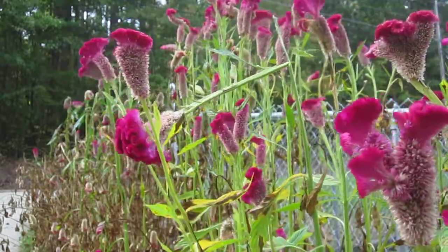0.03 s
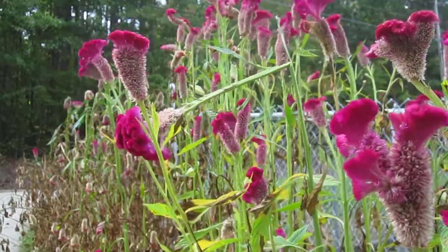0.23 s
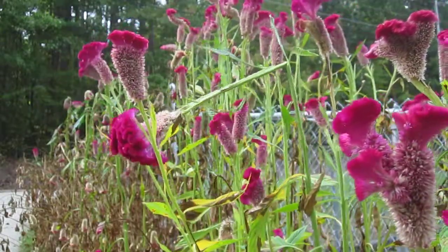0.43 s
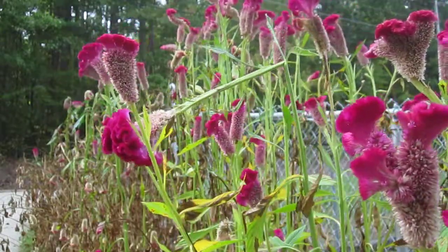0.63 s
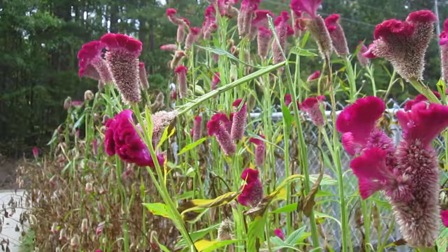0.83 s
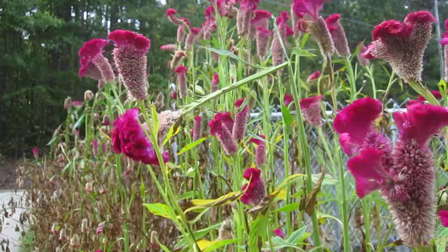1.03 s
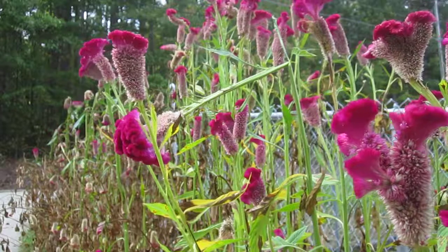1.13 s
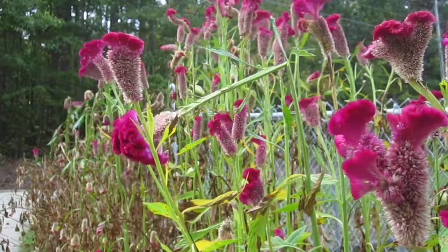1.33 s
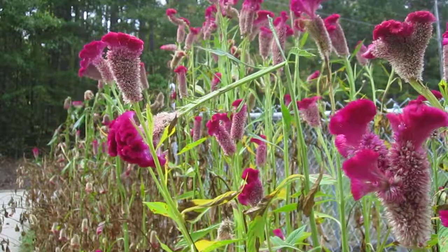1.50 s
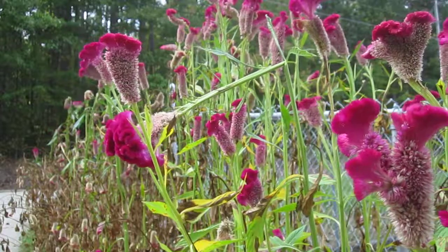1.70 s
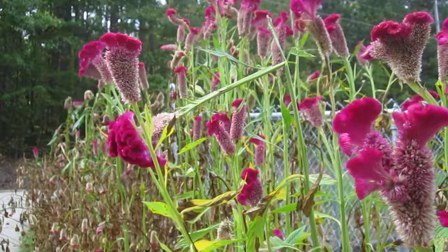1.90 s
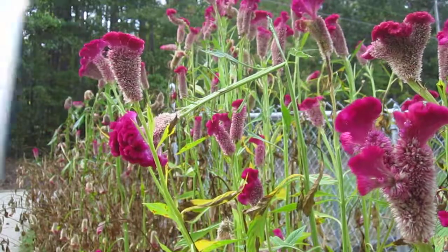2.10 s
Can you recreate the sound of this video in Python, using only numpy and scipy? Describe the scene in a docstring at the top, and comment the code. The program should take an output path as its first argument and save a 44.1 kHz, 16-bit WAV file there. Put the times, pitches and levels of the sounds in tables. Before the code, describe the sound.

Dry seed heads crackle and crunch as they are rubbed close up in a garden.

```python
"""Dry seed heads are rubbed and crushed right against a camera in a garden.
Thousands of tiny breaks make the husks crackle, larger husks snap, and stalks slip with short scuffs.
The scraping rings the stems and the camera's hollow case, which also gets a bump and two knocks.
Behind: the whine of the camera's drive, its zoom motor at the end, quiet air and two thin bird chirps."""
import sys
import numpy as np
from scipy import signal
from scipy.fft import rfft, irfft
from scipy.io import wavfile
from scipy.ndimage import uniform_filter1d

SR = 44100
rng = np.random.default_rng(int(sys.argv[2]) if len(sys.argv) > 2 else 0)


def store_pcm(level_fs):
    """Save levels as 16-bit WAV."""
    pcm = np.round(np.clip(level_fs, -1, 1) * 32767).astype(np.int16)
    wavfile.write(sys.argv[1], SR, np.atleast_2d(pcm).T)


N = 94815

# How hard the husks are rubbed: t/s, level/dB
RUBBING = [(0, -107), (.22, -60), (.27, -46.5), (.315, -37.5), (.355, -31), (.435, -29.5), (.465, -36),
           (.52, -30), (.55, -29.5), (.575, -41), (.605, -34.5), (.655, -38.5), (.705, -37), (.79, -37.5),
           (.845, -40), (.92, -41), (.965, -36.5), (1.01, -37.5), (1.045, -33.5), (1.08, -35),
           (1.12, -28.5), (1.15, -33.5), (1.21, -33.5), (1.26, -35.5), (1.295, -39.5), (1.385, -32),
           (1.43, -38), (1.47, -35), (1.502, -39), (1.535, -32), (1.565, -40), (1.64, -36.5), (1.685, -35),
           (1.725, -43.5), (1.795, -44.5), (1.85, -56.5), (1.92, -80)]
# Top fizz, stalk crunch and stem ring, each relative to the rubbing: t/s, level/dB
FIZZ_LEVEL = [(.25, -10), (.43, -10.5), (.55, -12), (.7, -8), (.9, -18), (1.1, -10), (1.3, -10),
              (1.47, -25), (1.6, -21), (1.68, -18), (1.8, -25)]
CRUNCH_LEVEL = [(.25, -25), (.35, -4), (.42, -13), (.9, -8), (1.03, -12.5), (1.075, -5.5), (1.14, -11),
                (1.37, -6), (1.47, -9), (1.52, -4), (1.57, -8), (1.68, -10), (1.74, -5)]
STEM_LEVEL = [(.3, -20), (.55, -8.5), (.8, -7), (1.1, -13), (1.28, -6.5), (1.38, -6), (1.47, 2),
              (1.55, -7.5), (1.63, -9), (1.7, -22)]
# Ring of the case, relative to the rubbing: t/s, low ring/dB, high ring/dB
CASE_LEVEL = [(.23, -28, -12), (.30, -14, -12), (.325, -19, -12), (.35, -15.5, -7), (.44, -9, -9),
              (.48, -13, -14.5), (.54, -13, -7), (.65, -12.5, -10.5), (.79, -13.5, -7.5), (.92, -14, -10.5),
              (1.1, -20, -11), (1.16, -17.5, -18), (1.39, -13, -12), (1.47, -17.5, -15),
              (1.54, -16.5, -14.5), (1.7, -19.5, -11.5), (1.78, -11, -23)]
# Tone colours of crackle, fizz and crunch: f/Hz, level/dB
HUSK_COLOUR = [(100, -29), (400, -36), (1100, -19.5), (2000, -7.5), (3100, -6), (4100, 2.5), (5300, 0),
               (7000, -3.5), (8800, -4.5), (10500, -3.5), (12500, -15), (16000, -29.5)]
FIZZ_COLOUR = [(2000, -50), (6500, 10), (9000, -30.5), (10400, -9), (12500, -6), (16000, -27)]
CRUNCH_COLOUR = [(100, -76.5), (400, -9.5), (800, -7), (1250, -14), (1750, -2), (2100, -3), (2600, 1),
                 (3300, 0.5), (4500, -10.5), (9000, -29.5)]
# Notes at which the stems and the case ring: f/Hz, level/dB, time to fade by 60 dB/s
STEM_NOTES = [(3680, -10, 0.049), (4050, -4.5, 0.018), (4370, -3, 0.02), (4590, -6.5, 0.04),
              (5310, -5.5, .03), (5770, -7.5, .025), (6460, -29, 0.017)]
CASE_LOW_NOTES = [(341, -1, 0.074), (395, -3.5, 0.037), (568, 5, 0.054), (574.4, 5, 0.064)]
CASE_HIGH_NOTES = [(1500, -10, 0.028), (1501, 13.5, 0.035), (1570, 6.5, 0.022)]

def rubbed_husks():
    """Clumps of tiny breaks crackle, fizz and crunch, and ring the stems and the case."""
    clumps = amp(1.5 * wander(seconds=.0023))
    husks, stalks, chaff = (tiny_breaks() * clumps for _ in range(3))
    crackle = colour(husks, HUSK_COLOUR)
    # The crackle also bounces off the case and stems close by.
    echo = signal.oaconvolve(crackle, unit_energy(burst(decay_s=.0013)))[:N] / np.sqrt(SR)
    layers = (steady(crackle + amp(-7) * echo)
              + amp(curve(FIZZ_LEVEL)) * steady(colour(chaff, FIZZ_COLOUR))
              + amp(curve(CRUNCH_LEVEL)) * steady(colour(stalks, CRUNCH_COLOUR))
              + amp(curve(STEM_LEVEL)) * steady(ring(chaff, STEM_NOTES))
              + amp(curve(CASE_LEVEL, column=1)) * steady(ring(husks, CASE_LOW_NOTES))
              + amp(curve(CASE_LEVEL, column=2)) * steady(ring(chaff, CASE_HIGH_NOTES)))
    return amp(curve(RUBBING)) * layers


def tiny_breaks(husks=16, breaks_per_s=7000):
    """Many husks crack at random, each with its own click and its own louder moments."""
    out = np.zeros(N)
    for _ in range(husks):
        size_db = 2 * np.minimum(rng.exponential(1, N), 4)
        swell_db = 3 * wander(seconds=.016)
        hits = (rng.random(N) < breaks_per_s / husks / SR) * rng.choice([-1, 1], N)
        click = unit_energy(burst(decay_s=.00043, size=256))
        out += signal.oaconvolve(amp(size_db + swell_db) * hits, click)[:N]
    return out


# Larger husks breaking: t/s, energy/dB, fade time/s, case ring relative to the snap/dB
HUSK_SNAPS = [(0.2269, -62, 0.0022, -5), (.244, -61, 0.01, -6), (0.2642, -59, 0.0013, -20),
              (0.28, -59.5, 0.0066, -4), (0.2919, -53.5, .005, -4.5), (0.3313, -67, 0.0018, -21),
              (0.331, -57.5, 0.0028, -5), (0.3675, -59, 0.0023, -10), (.419, -64, .002, 3),
              (0.5013, -62, 0.0017, -1.5), (0.5902, -52, 0.0057, -5.5), (0.6992, -55, 0.0019, -9),
              (.7227, -57, .0012, -28), (0.7639, -55, 0.0019, -5), (.7992, -54.5, 0.003, -5),
              (.824, -58, 0.002, -8), (0.857, -59.5, 0.0017, -4), (0.8877, -56, 0.0014, -15),
              (1.0345, -55, 0.0031, -25), (1.041, -51.5, 0.0017, -7.5), (1.067, -52, 0.0013, -16),
              (1.093, -56.5, 0.0007, -25), (1.109, -54.5, 0.0024, -3.5), (1.1788, -51.5, 0.0021, -8.5),
              (1.2492, -56, 0.0019, -20), (1.299, -59, 0.00053, -6), (1.397, -69, 0.00092, -17),
              (1.4690, -56, 0.0034, -29), (1.4835, -54.5, 0.0011, -39), (1.527, -69, 0.0015, -20),
              (1.5358, -53, .003, -12), (1.5465, -61, 0.00081, -13), (1.5735, -52.5, 0.00036, -32),
              (1.581, -58, .0008, -29), (1.5847, -61.5, 0.00037, -23), (1.5912, -55, 0.00036, -22),
              (1.633, -56.5, 0.0014, -24), (1.666, -58.5, 0.0026, -14), (1.6858, -57.5, 0.0024, -15),
              (2.087, -71, .003, -24)]
# Tone colour of a snap: f/Hz, level/dB
SNAP_COLOUR = [(150, -31), (1100, -33), (2000, -9.5), (4200, 1.5), (7000, -3.5), (10500, -6), (13000, -15),
               (16000, -45)]

def snapping_husks():
    """A larger husk breaks sharply, crumbles, and rings the stems and the case."""
    out = np.zeros(N)
    for start, db, decay_s, case_db in HUSK_SNAPS:
        crack = burst(decay_s) - 1.07 * signal.unit_impulse(4096)  # crumbling and the first break
        snap = unit_energy(colour(crack, SNAP_COLOUR))
        stem = amp(-14) * unit_energy(ring(crack, STEM_NOTES))
        case = unit_energy(ring(crack, CASE_HIGH_NOTES))
        case += amp(-11) * unit_energy(ring(crack, CASE_LOW_NOTES))
        add(out, start, amp(db) * (snap + stem + amp(case_db) * case))
    return out


# Slips of a stalk: t/s, spread in time/s, f/Hz, relative spread in pitch, level/dB
STALK_SLIPS = [(1.023, 0.0021, 990, 0.39, -41), (1.067, 0.0026, 2450, .15, -32.5),
               (1.078, 0.0037, 1130, 0.14, -46), (1.231, 0.003, 1750, .15, -35.5),
               (1.517, 0.0024, 2490, .3, -36), (1.633, 0.0021, 4700, 0.061, -31),
               (1.705, 0.0047, 2510, 0.11, -37.5), (1.989, 0.0035, 1850, .35, -49),
               (2.09, .002, 8770, .04, -41.5)]

def slipping_stalks():
    """Each slip is a brief swell of noise around one pitch."""
    out, t = np.zeros(N), np.arange(N) / SR
    for middle, spread_s, hz, width, db in STALK_SLIPS:
        band = signal.butter(2, hz * np.exp([-width, width]), "band", fs=SR, output="sos")
        scuff = unit_rms(signal.sosfilt(band, rng.standard_normal(N)))
        out += amp(db) * np.exp(-((t - middle) / spread_s) ** 2 / 2) * scuff
    return out


# Knocks on the case: t/s, deep ring energy/dB, hollow ring energy/dB, tick energy/dB
CASE_KNOCKS = [(0.3457, -66, -53.5, -54), (1.85, -61.5, -63.5, -60.5)]
# Notes that a knock rings: f/Hz, level/dB, time to fade by 60 dB/s
DEEP_NOTE = [(333, 0, 0.13)]
HOLLOW_NOTES = [(478, 0, 0.018), (585, -1, 0.057)]
# Tone colour of the tick: f/Hz, level/dB
TICK_COLOUR = [(150, -42), (1000, -20), (2000, -6), (2900, 0.5), (4000, -6), (6000, -15), (14000, -56)]

def knocked_case(contact_s=.0013, bump_at_s=.126, bump_hz=228, bump_spread_s=.0019):
    """Two short blows tick and ring the hollow case; the hand gives one soft, dull bump."""
    out, t = np.zeros(N), np.arange(N) / SR
    blow = np.sin(np.pi * np.minimum(t[:SR // 2] / contact_s, 1)) ** 2
    for start, deep_db, hollow_db, tick_db in CASE_KNOCKS:
        add(out, start, amp(deep_db) * unit_energy(ring(blow, DEEP_NOTE)))
        add(out, start, amp(hollow_db) * unit_energy(ring(blow, HOLLOW_NOTES)))
        add(out, start, amp(tick_db) * unit_energy(colour(burst(decay_s=.0018), TICK_COLOUR)))
    from_bump = t - bump_at_s
    swell = np.exp(-(from_bump / bump_spread_s) ** 2 / 2)
    return out + amp(-38.5) * swell * np.sin(2 * np.pi * bump_hz * from_bump)


# The drive's paired tones and its fainter single ones: f/Hz, level/dB
DRIVE_PAIRS = [(1864, -62), (2151, -59.5), (2438, -62)]
DRIVE_SINGLES = [(2275, -63), (2406, -65), (5860, -68), (8690, -75)]

def camera_drive(pair_gap_hz=30, waver=.00166):
    """The drive whines throughout; each main tone has a twin just above it."""
    pairs = sum(tone(hz, db, waver) + tone(hz + pair_gap_hz, db, waver) for hz, db in DRIVE_PAIRS)
    return pairs + sum(tone(hz, db, waver) for hz, db in DRIVE_SINGLES)


# The zoom motor's tones and the colour of its hiss: f/Hz, level/dB
ZOOM_TONES = [(6230, -73), (7203, -73), (7951, -72), (8446, -66), (8694, -61.5), (8942, -68), (9437, -66)]
ZOOM_COLOUR = [(2000, -22), (4800, -5), (5600, 1), (6900, 3), (7700, -2), (8700, 2), (9500, -1),
               (10000, -20), (14000, -23)]
# How fast it turns: t/s, relative speed
ZOOM_SPEED = [(1.8, 1.002), (1.98, 1), (2.05, .994), (2.15, .996)]

def zoom_motor(start_s=1.8, rise_s=.052):
    """A small motor fades in with a hiss and high tones that follow its speed."""
    whine = sum(tone(hz * curve(ZOOM_SPEED), db, waver=.00326) for hz, db in ZOOM_TONES)
    hiss = amp(-54) * unit_rms(colour(rng.standard_normal(N), ZOOM_COLOUR))
    fade_in = np.clip((np.arange(N) / SR - start_s) / rise_s, 0, 1)
    return (whine + hiss) * fade_in


# Thin chirps: t/s, length/s, top f/Hz, level/dB
BIRD_CHIRPS = [(.228, 0.054, 7100, -45), (1.993, 0.093, 7040, -47)]

def far_bird(bend=.042):
    """Each chirp is a high whistle whose pitch and loudness rise and fall together."""
    out = np.zeros(N)
    for start, length, hz, db in BIRD_CHIRPS:
        arch = np.sin(np.pi * np.arange(0, length, 1 / SR) / length)
        pitch = hz * (1 + bend * (arch - 1))
        add(out, start, amp(db) * arch ** 2 * np.sin(2 * np.pi * np.cumsum(pitch) / SR))
    return out


# Tone colour of the outdoor air: f/Hz, level/dB
AIR_COLOUR = [(20, -1), (50, 0.5), (110, 4.5), (200, 1.5), (550, -0.5), (1000, 0), (1500, -2.5),
              (2300, 6.5), (3100, -2.5), (5000, -5), (7000, -5), (9000, -6), (11000, -13), (13000, -23),
              (16000, -24)]

def garden_air():
    """A quiet, even wash of noise."""
    return amp(-49) * unit_rms(colour(rng.standard_normal(N), AIR_COLOUR, size=4096))


def amp(db):
    """Turns decibels into a multiplier."""
    return 10 ** (np.asarray(db) / 20)


def unit_rms(x):
    """Scales a sound to an average strength (rms) of 1."""
    return x / np.sqrt(np.mean(x ** 2) + 1e-20)


def unit_energy(x):
    """Scales a sound to the energy of one second at rms 1."""
    return x / np.sqrt(np.sum(x ** 2) / SR + 1e-20)


def steady(x, size=1300):
    """Evens out slow swells, so that the tables alone set the level."""
    return x / np.sqrt(abs(uniform_filter1d(x ** 2, size)) + 1e-12)


def curve(table, column=1):
    """Joins the points of a time table with straight lines."""
    rows = np.array(table)
    return np.interp(np.arange(N) / SR, rows[:, 0], rows[:, column])


def add(mix, start_s, sound):
    """Mixes a sound in at the given time."""
    part = mix[max(round(start_s * SR), 0):][:len(sound)]
    part += sound[:len(part)]


def wander(seconds):
    """A smooth random wobble of rms 1 that changes over the given time."""
    hz = np.fft.rfftfreq(N, 1 / SR)
    return unit_rms(irfft(rfft(rng.standard_normal(N)) * np.exp(-(hz * seconds) ** 2), N))


def burst(decay_s, size=4096):
    """One break: noise that starts sharply and dies away."""
    return rng.standard_normal(size) * np.exp(-np.arange(size) / SR / decay_s)


def tone(hz, db, waver):
    """One motor tone whose pitch wavers."""
    turns = np.cumsum(hz * (1 + waver * wander(seconds=.0192))) / SR + rng.random()
    return amp(db) * np.sqrt(2) * np.sin(2 * np.pi * turns)


def colour(x, points, size=1024):
    """Gives a sound a tone colour while keeping its clicks sharp."""
    point_hz, db = np.transpose(points)
    hz = abs(np.fft.fftfreq(size, 1 / SR))
    log_gain = np.log(amp(np.interp(np.log(hz + 1), np.log(point_hz + 1), db)))
    response = np.fft.ifft(np.exp(np.conj(signal.hilbert(log_gain)))).real
    return signal.oaconvolve(x, response)[:len(x)]


def ring(x, notes, size=6000):
    """Shakes an object so that its notes ring and fade; little sounds below the first note."""
    t = np.arange(size) / SR
    response = sum(amp(db - 60 * t / fade_s) * np.sin(2 * np.pi * hz * t) for hz, db, fade_s in notes)
    low_cut = signal.butter(5, .87 * notes[0][0], "high", fs=SR, output="sos")
    return signal.oaconvolve(x, signal.sosfilt(low_cut, response))[:len(x)]


def scene():
    """All sources at one microphone."""
    handling = rubbed_husks() + snapping_husks() + slipping_stalks() + knocked_case()
    return (handling + camera_drive() + zoom_motor() + far_bird() + garden_air())[None]


def record(dry):
    """The camera cuts off the treble above 16000 Hz."""
    treble_cut = signal.firwin(511, 16000, window=("kaiser", 9), fs=SR)
    return signal.oaconvolve(dry, treble_cut[None], "same")


dry = scene()
out = record(dry)
store_pcm(out)
```